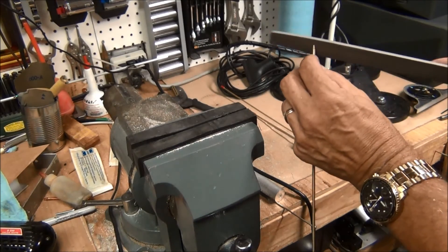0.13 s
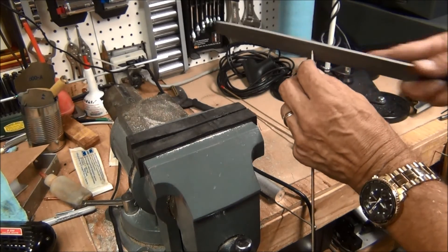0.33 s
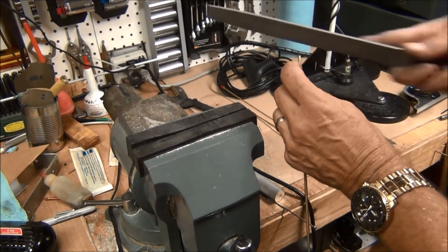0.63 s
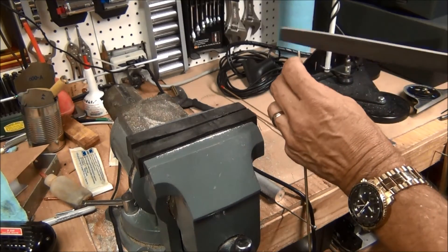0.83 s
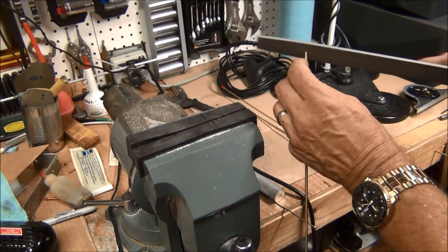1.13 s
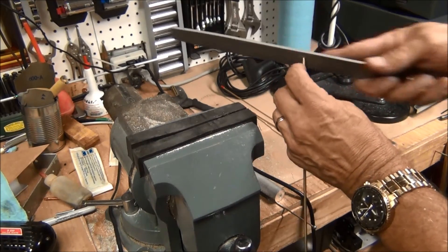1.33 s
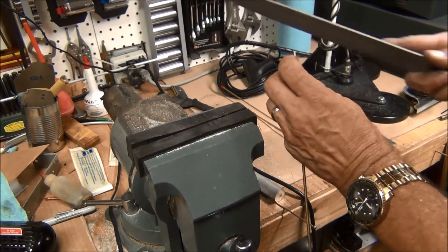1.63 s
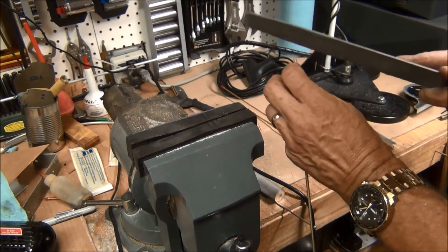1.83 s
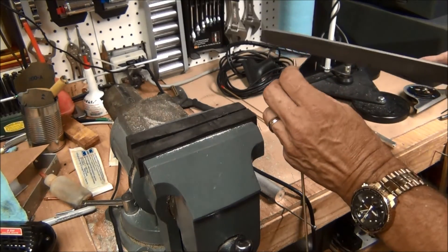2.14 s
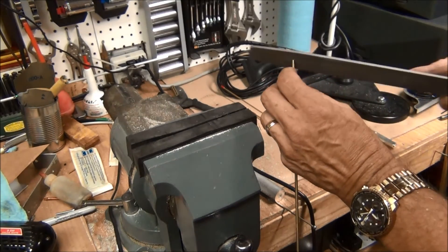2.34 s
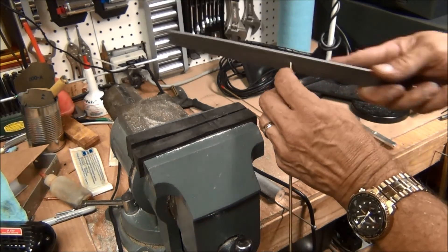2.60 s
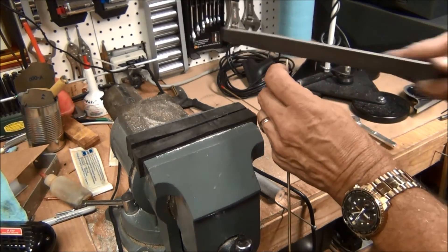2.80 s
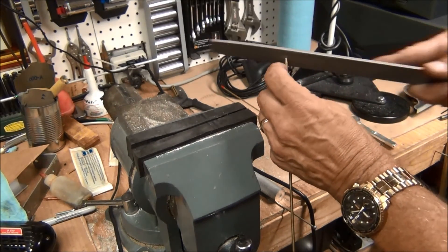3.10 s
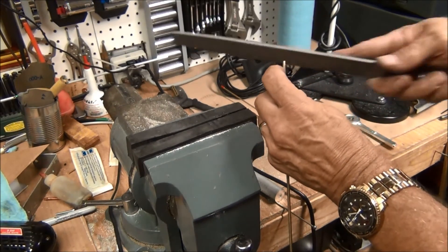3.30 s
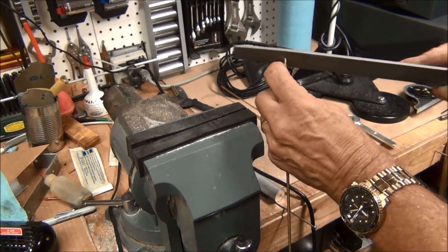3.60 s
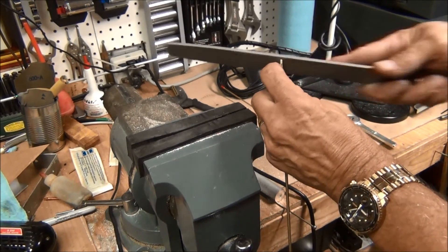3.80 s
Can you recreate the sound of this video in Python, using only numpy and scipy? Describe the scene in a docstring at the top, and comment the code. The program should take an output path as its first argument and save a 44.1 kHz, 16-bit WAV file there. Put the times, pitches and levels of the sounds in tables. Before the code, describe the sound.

Five bright, gritty file strokes on a small metal rod, with knocks against a wooden bench

```python
"""Filing a brass rod

A flat hand file makes five strokes across the tip of a thin, hand-held brass rod in a small workshop.
Each tooth snaps and tears off grit, at a rate set by the stroke's speed, and this force rings the blade.
The blade lands with bright ticks, and the long rod knocks and chatters against the bench.
A faint whistle follows the second stroke as the file swings back; a low room hum lies underneath."""
import sys
import numpy as np
from scipy import signal
from scipy.fft import rfft, irfft
from scipy.io import wavfile

SR = 44100
rng = np.random.default_rng(int(sys.argv[2]) if len(sys.argv) > 2 else 0)


def materialize(psi):
    """Save the field psi as 16-bit PCM at rate SR to the path in sys.argv[1].

    A 1-D psi becomes a single channel; in a 2-D psi each row is a channel.
    """
    bounded = np.clip(np.atleast_2d(psi).T, -1, 1)
    quanta = np.round(bounded * 32767).astype(np.int16)
    wavfile.write(sys.argv[1], SR, quanta)


N = 174195  # length in samples


def undb(db):
    """Turn decibels into a plain factor."""
    return 10 ** (np.asarray(db) / 20)


def unit(x):
    """Scale to rms 1."""
    return x / np.sqrt(np.mean(x ** 2))


def impact(x):
    """Scale to energy 1."""
    return x / np.sqrt(np.sum(x ** 2))


def over_hz(points):
    """Read (Hz, value) points at every bin of a spectrum."""
    hz, value = np.array(points).T
    bins_hz = np.arange(N // 2 + 1) * SR / N
    return np.interp(np.log(bins_hz + 1), np.log(hz), value)


def colour(x, points):
    """Filter with the given (Hz, dB) response, built from its cepstrum so nothing sounds early."""
    cepstrum = irfft(np.log(undb(over_hz(points))), N)[:N // 2]
    cepstrum[1:] *= 2
    response = np.exp(rfft(cepstrum, N))
    return irfft(response * rfft(x, N), N)[:len(x)]


def low(x, hz):
    """Gentle low-pass."""
    return signal.sosfilt(signal.butter(1, min(hz, SR / 2 - 1), fs=SR, output="sos"), x)


def thin(x, hz):
    """Steep high-pass: small parts radiate no bass."""
    return signal.sosfilt(signal.butter(4, hz, "high", fs=SR, output="sos"), x)


def ring(x, response):
    """Play x through an impulse response."""
    return signal.fftconvolve(x, response)[:N]


def fade(t60):
    """Half a second of exponential decay, falling 60 dB in t60 seconds."""
    return np.exp(-np.log(1000) * np.arange(SR // 2) / SR / t60)


def mode(hz, t60):
    """A decaying sine."""
    return fade(t60) * np.sin(2 * np.pi * hz * np.arange(SR // 2) / SR)


def burst(t60):
    """Decaying noise."""
    return fade(t60) * rng.standard_normal(SR // 2)


def walk(hz):
    """Random wandering around zero: straight lines between hz random points per second."""
    knots = rng.standard_normal(N)
    return np.interp(np.arange(N) * hz / SR, np.arange(N), knots)


def add(track, start, sound):
    """Mix a sound in at a time in seconds."""
    i = int(start * SR)
    track[i:i + len(sound)] += sound[:N - i]


# Colour of the room hum. Each row: frequency in Hz, gain in dB.
HUM_COLOUR = [(15, -25), (25, -19.5), (107, 2.5), (284, -8), (486, -4.5), (527, -9), (604, -8.5),
              (905, -11), (1550, -16), (1820, -15.5), (2730, -20), (15800, -23.5)]
HUM_DB = -48


def room_hum():
    """Steady rumble, alike in both ears, under a faint wide hiss."""
    mid = unit(colour(rng.standard_normal(N), HUM_COLOUR))
    side = unit(colour(rng.standard_normal(N), HUM_COLOUR))
    side = colour(side, [(60, -43), (150, -14.5), (500, -5.5), (2000, -1.5), (12000, -8.5)])
    return undb(HUM_DB) * (mid + side * np.array([[1], [-1]]))


# The file strokes. Each row: start in seconds, end in seconds, tooth rate at the start in Hz, top rate in Hz.
FILE_STROKES = [(.10, 0.559, 227.9, 788.7), (0.997, 1.48, 269.2, 799), (2.361, 2.713, 299.3, 743),
                (3.014, 3.308, 328.9, 888.7), (3.568, 3.936, 300, 755.3)]
# How hard the teeth bite, one curve per stroke. Each point: time in seconds, bite in dB.
BITE_CURVES = [
    [(0.116, -41), (0.258, -32.5), (0.33, -32.5), (0.446, -25.5), (0.49, -14.5), (0.53, -47)],
    [(1.02, -57.5), (1.09, -29.5), (1.138, -28), (1.18, -21), (1.218, -26), (1.25, -19), (1.276, -19.5),
     (1.312, -11.5), (1.362, -15), (1.37, -19), (1.42, -14.5), (1.45, -47)],
    [(2.366, -28), (2.406, -36.5), (2.476, -28.5), (2.56, -29), (2.596, -18.5), (2.606, -14), (2.624, -22),
     (2.632, -17), (2.652, -15.5), (2.674, -36), (2.68, -26)],
    [(3.036, -37), (3.05, -41), (3.082, -24.5), (3.186, -24), (3.212, -12.5), (3.26, -17), (3.285, -36)],
    [(3.592, -29), (3.602, -39.5), (3.652, -24.5), (3.69, -32.5), (3.718, -30.5), (3.762, -22),
     (3.778, -25), (3.796, -26), (3.908, -28.5), (3.925, -42)],
]
FASTEST_AT, END_SPEED = .68, .68  # share of the stroke's time; share of the top speed


def stroke_motion():
    """Tooth rate in Hz, bite, and share of the travel done: each stroke speeds up, then slows a little."""
    t = np.arange(N) / SR
    rate, bite, travel = np.full(N, 300.), np.zeros(N), np.zeros(N)
    for (start, end, first_hz, top_hz), curve in zip(FILE_STROKES, BITE_CURVES):
        on = (t >= start) & (t < end)
        u = (t[on] - start) / (end - start)
        speeding_up = first_hz + (top_hz - first_hz) * np.sin(np.pi / 2 * u / FASTEST_AT) ** 2
        slowing = top_hz * (1 - (1 - END_SPEED) * ((u - FASTEST_AT) / (1 - FASTEST_AT)) ** 2)
        rate[on] = np.where(u < FASTEST_AT, speeding_up, slowing)
        travel[on] = np.cumsum(rate[on]) / np.sum(rate[on])
        s, db = np.array(curve).T
        bite += undb(np.interp(t, s, db, left=-200, right=-200))
    return rate, bite, travel


# Bending modes of the blade. Each row: frequency in Hz, width of the resonance in Hz, level in dB.
BLADE_MODES = [(2820, 90, -5), (3780, 75, -3), (4900, 120, 1), (5930, 75, 0), (7070, 220, -2),
               (9400, 140, 1), (10500, 75, -5), (10970, 75, -1), (11400, 110, -3), (11900, 100, -2),
               (12330, 86, -3)]


def blade_modes():
    """The ring of each bending mode of the blade; a narrower resonance rings longer."""
    rings = []
    for hz, width, db in BLADE_MODES:
        t60 = np.log(1000) / np.pi / width
        rings.append(undb(db) * np.sqrt(width) * impact(mode(hz, t60)))
    return rings


NODES_PER_STROKE = 3.045  # for a 5 kHz blade mode


def blade_ring(force, travel):
    """Blade modes swell and fade as their nodes pass the rod; higher modes have more nodes."""
    total = np.zeros(N)
    for (hz, _, _), response in zip(BLADE_MODES, blade_modes()):
        nodes = NODES_PER_STROKE * np.sqrt(hz / 5000)
        swing = np.cos(np.pi * nodes * travel + rng.uniform(0, 2 * np.pi))
        total += ring(force, response) * swing
    return unit(total)


SHIMMER_T60_S = 0.03


def shimmer(x):
    """The steel blade's many weak twisting modes, packed closely together."""
    pitches = rng.uniform(2500, 12000, size=80)  # Hz
    return ring(x, sum(rng.choice([-1, 1]) * mode(hz, SHIMMER_T60_S) for hz in pitches))


RASP_PATCHY_DB, WHIRR_PATCHY_DB = 3.5, 2.5
PATCH_HZ = 56.25  # new random points per second


def patchy(x):
    """Bands of the scrape swell and fade on their own as the contact shifts."""
    spectrum, bins_hz = rfft(x), np.arange(N // 2 + 1) * SR / N
    centres = np.geomspace(1000, 16000, 13)  # Hz
    total = np.zeros(N)
    for band in np.eye(len(centres)):
        part = irfft(spectrum * np.interp(bins_hz, centres, band), N)
        total += part * undb(RASP_PATCHY_DB * walk(PATCH_HZ))
    return total


SWELL_HZ, SWELL_T60_S, SWELL_DB = 4900, .003, -4
SWELL_AT, SWELL_SPAN = 0.68, 0.052  # shares of the travel


def sing_out(sound, rasp, travel):
    """The blade sings out near 5 kHz at one point of each stroke."""
    swell = undb(SWELL_DB) * np.exp(-((travel - SWELL_AT) / SWELL_SPAN) ** 2)
    singing = unit(ring(rasp, mode(SWELL_HZ, SWELL_T60_S)))
    return (sound + swell * singing) / np.hypot(1, swell)


# Colour of the torn grit. Each row: frequency in Hz, gain in dB.
RASP_COLOUR = [(180, -68), (300, -22.5), (622, -18.5), (759, -11), (990, -19), (1450, -8.5), (2200, -8.5),
               (2770, -5.5), (3490, -13.5), (3670, -9.5), (4330, -7), (4870, -3), (5560, -3.5), (7130, -2),
               (7870, -5), (9610, -0.5), (12700, 0), (15800, -5.5)]
# Colour of the tooth tone. Each row: frequency in Hz, gain in dB.
WHIRR_COLOUR = [(200, -35), (450, 3.5), (750, -5.5), (1100, -12.5), (1450, -0.5), (2200, -15),
                (4000, -26.5)]
RASP_DB, BLADE_DB, SHIMMER_DB, TOOTH_DB = -4.5, -7, -2.5, -30
TOOTH_JITTER = .06  # share of the tooth rate
TOOTH_SCATTER_DB, GRIT_SCATTER_DB = 0.5, 2.5
CUT_SHARE = .55  # how slowly the grit dies away, in tooth spacings
SNAG_DB, SNAG_HZ = 0.5, 130.2
BRIGHTEN_DB, TREBLE_HZ = 4, 7950  # the top treble rises over each stroke


def filing():
    """Each tooth snaps and tears grit from the brass, and that force rings the blade."""
    rate, bite, travel = stroke_motion()
    teeth = np.cumsum(rate * (1 + TOOTH_JITTER * walk(400))) / SR
    tooth = teeth.astype(int)
    size = undb(TOOTH_SCATTER_DB * rng.standard_normal(N))[tooth] * undb(SNAG_DB * walk(SNAG_HZ))
    snaps = unit(np.diff(tooth, prepend=0) * size)
    tearing = size * np.exp(-(teeth % 1) / CUT_SHARE)
    rough_noise = rng.standard_normal(N) * undb(GRIT_SCATTER_DB * rng.standard_normal(N))
    force = unit(unit(tearing * rough_noise) + undb(-7.5) * snaps)

    rasp = unit(colour(force, RASP_COLOUR))
    sound = undb(RASP_DB) * rasp + undb(BLADE_DB) * blade_ring(force, travel)
    sound = patchy(sound + undb(SHIMMER_DB) * unit(shimmer(rasp)))
    dull = low(sound, TREBLE_HZ)
    sound = dull + (sound - dull) * undb(BRIGHTEN_DB * (travel - 1))
    sound = sing_out(sound, rasp, travel)

    whirr = colour(snaps - snaps.mean(), WHIRR_COLOUR) * undb(WHIRR_PATCHY_DB * walk(PATCH_HZ))
    # the power below 1 makes the tooth tone follow the bite less strongly
    return bite * sound + undb(TOOTH_DB) * bite ** 0.53 * unit(whirr)


# The file lands on or grazes the rod. Each row: time in seconds, level in dB.
FILE_LANDINGS = [(.101, -7.5), (0.141, -19), (1.01, -25), (2.364, -3.5), (3.025, -6.5), (3.36, -18),
                 (3.58, -5)]


def landings():
    """The blade touches down with a bright double tick, 4.7 ms apart."""
    out, blade = np.zeros(N), impact(sum(blade_modes()))
    for start, db in FILE_LANDINGS:
        first = 0.88 * blade + 0.77 * impact(colour(burst(0.036), RASP_COLOUR))
        second = impact(colour(burst(0.012), RASP_COLOUR))
        add(out, start, undb(db) * first)
        add(out, start + 0.0047, undb(db) * second)
    return out


# Modes of rod and bench. Each row: frequency in Hz, 60 dB decay time in seconds before the cap, level in dB.
ROD_BENCH_MODES = [(295, 0.05, -9), (374, 0.14, -13), (662.5, 0.17, -12), (748, 0.13, -29.5),
                   (809.3, 0.15, 3), (870, 0.24, -5), (969, .12, -5.5), (1035, 0.2, -13), (1258, 0.26, -11),
                   (1377, 0.06, -6.5), (1478, 0.046, -5.5), (1750, 0.15, -35), (1930, 0.22, -14.5),
                   (2435, 0.3, -21.5)]
# Colour of the dull thud. Each row: frequency in Hz, gain in dB.
THUD_COLOUR = [(71, -49.5), (120, -40.5), (218, -37.5), (338, -9), (590, -21.5), (828, 0), (1230, -14.5),
               (1630, -16), (1760, -19), (3470, -29.5), (3760, -30.5), (6310, -45), (9400, -43.5),
               (14000, -54)]
BENCH_RING_DB, THUD_T60_S = -1.5, 0.078
LONGEST_RING_S = .2  # cap on the decay times
STRIKE_LIFT_DB, STRIKE_WIDTH_HZ = 9, 114  # the point of contact favours nearby modes


def blow(ring_hz):
    """One blow of rod on bench: a noisy thud plus ringing modes, strongest around ring_hz."""
    modes = np.zeros(SR // 2)
    for k, (hz, t60, db) in enumerate(ROD_BENCH_MODES):
        lift = STRIKE_LIFT_DB * np.exp(-((hz - ring_hz) / STRIKE_WIDTH_HZ) ** 2)
        modes += (-1) ** k * undb(db + lift) * mode(hz, min(t60, LONGEST_RING_S))
    thud = impact(colour(burst(THUD_T60_S), THUD_COLOUR))
    return impact(thud + undb(BENCH_RING_DB) * impact(modes))


# The rod hits the bench.
# Each row: time in seconds, level in dB before KNOCK_DB, hardness (treble gain) in dB, favoured ring in Hz.
ROD_KNOCKS = [(1.24, 0.5, 8.5, 800), (1.28, -6, 7, 1363), (1.298, -22.5, 18.5, 1300), (1.573, -35, -6, 615),
              (1.795, -39.5, 16, 1020), (2.376, -0.5, 8, 960), (2.42, -3.5, -2, 910), (2.68, -0.5, 4, 770),
              (2.735, -30.5, 17, 800), (2.822, -10, -2.5, 780), (2.894, -5, 0, 840), (2.934, -16, -13, 850),
              (2.986, -20, -11, 800), (3.082, -14, -3, 830), (3.119, -9, 11.5, 1050),
              (3.275, -8, 16.5, 835), (3.406, -7, 7.5, 950), (3.524, -13.5, -2, 947), (3.541, -14, -3, 950),
              (3.596, -11, 8, 975), (3.643, -8.5, 6.5, 960), (3.667, -3.5, 8.5, 1010),
              (3.722, -22, 22.5, 953), (3.82, 0.5, 2, 904), (3.854, -5.5, 16, 1010), (3.903, -6, 7.5, 943)]
KNOCK_DB, HARD_HZ = 11.5, 1480  # level added to every knock; hardness acts above this


def knocking():
    """The rod's free length strikes the bench; harder knocks have more treble."""
    out = np.zeros(N)
    for start, db, hard_db, ring_hz in ROD_KNOCKS:
        hit = blow(ring_hz)
        soft = low(hit, HARD_HZ)
        add(out, start, undb(KNOCK_DB + db) * (soft + undb(hard_db) * (hit - soft)))
    return out


# The dragged rod chatters. Each row: start in seconds, end in seconds, level in dB.
ROD_CHATTERS = [(1.272, 1.311, -34), (3.033, 3.097, -29), (3.114, 3.169, -21), (3.587, 3.668, -34.5),
                (3.656, 3.716, -20.5), (3.708, 3.813, -32), (3.825, 3.916, -28)]
CHATTER_HZ, CHATTER_SCATTER_DB = 186.2, 1  # middle tap rate; spread of tap levels


def chattering():
    """Quick, uneven taps on the bench while the file drags the rod."""
    out = np.zeros(N)
    for start, end, db in ROD_CHATTERS:
        length = int((end - start) * SR)
        turns = np.cumsum(CHATTER_HZ * np.exp(.5 * walk(300)))[:length] / SR
        sizes = undb(CHATTER_SCATTER_DB * rng.standard_normal(length))
        taps = np.diff(np.floor(turns), prepend=-1) * sizes
        tap_colour = [(150, -12.5), (350, 5), (800, -0.5), (1300, 2.5), (3000, 8)]  # Hz, dB
        body = impact(colour(blow(ring_hz=1054), tap_colour))
        add(out, start, undb(db) * signal.fftconvolve(unit(taps), body))
    return out


# Faint whistle as the file swings back. Each row: time in seconds, pitch in Hz, level in dB.
WHISTLE_GLIDE = [(1.49, 2380, -73), (1.53, 2480, -62), (1.57, 2520, -60), (1.62, 2330, -69)]
# Tones in the whistle. Each row: multiple of the pitch, level in dB.
WHISTLE_TONES = [(1, -4), (4.4, -5), (5, 0), (6, -5)]


def back_swing():
    """A thin gliding whistle between two strokes: a few sines on one wavering pitch."""
    t = np.arange(N) / SR
    s, hz, db = np.array(WHISTLE_GLIDE).T
    pitch = np.interp(t, s, hz) * (1 + .014 * walk(1500))
    phase = 2 * np.pi * np.cumsum(pitch) / SR
    tones = sum(undb(tone_db) * np.sin(k * phase) for k, tone_db in WHISTLE_TONES)
    return undb(np.interp(t, s, db, left=-200, right=-200)) * tones


ROOM_T60_S, ROOM_TREBLE_T60_S = 0.23, 0.11


def workshop(x, room_db, width):
    """Short reflections off the bench and the cluttered walls; treble dies sooner than bass."""
    def tail():
        bass, treble = burst(ROOM_T60_S), burst(ROOM_TREBLE_T60_S)
        noise = low(bass, 2300) + treble - low(treble, 2500)
        return ring(x, impact(noise * (1 - fade(0.018))))  # the reflections build up gradually
    return x + undb(room_db) * (tail() + width * tail() * np.array([[1], [-1]]))


# Loudness of the file between the ears. Each row: frequency in Hz, left minus right in dB.
EAR_BALANCE = [(700, -.5), (2400, 0.3), (4400, -2), (8100, -3), (15000, 0.4)]
# Timing of the file between the ears. Each row: frequency in Hz, lead of the left in radians.
EAR_PHASE = [(1000, 0), (3000, 0.94), (4800, -0.72), (7200, -0.91), (9400, -0.58), (14000, -0.46)]
FILE_ROOM_DB, KNOCK_ROOM_DB, SPREAD_DB = -13, -11, -13


def scene():
    """The file sits a little right, its moving blade differing per side; the knocks come from the middle."""
    hum = room_hum()
    scrape = thin(filing() + landings(), hz=234) + back_swing()
    spread = undb(SPREAD_DB) * ring(scrape, impact(burst(.03))) * walk(80) * np.array([[1], [-1]])
    file = workshop(scrape, room_db=FILE_ROOM_DB, width=0.27) + spread
    # half of each difference goes to each ear, in opposite directions
    place = undb(over_hz(EAR_BALANCE) / 2) * np.exp(.5j * over_hz(EAR_PHASE))
    file = irfft(rfft(file) * np.array([place, 1 / place]), N)
    rod = thin(knocking() + chattering(), hz=193)
    return file + workshop(rod, room_db=KNOCK_ROOM_DB, width=0.35) + hum


TOP_HZ = 15900


def record(dry):
    """The recorder cuts the top: a very steep low-pass."""
    return signal.sosfilt(signal.ellip(10, .2, 80, TOP_HZ, fs=SR, output="sos"), dry)


dry = scene()
out = record(dry)
materialize(out)
```